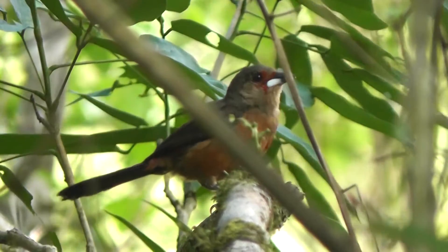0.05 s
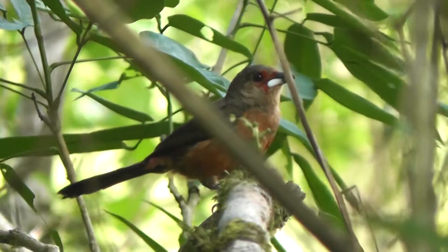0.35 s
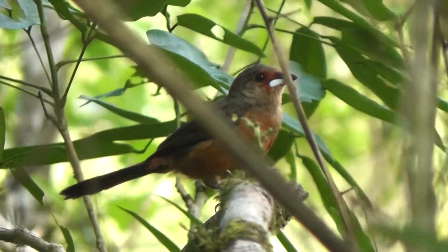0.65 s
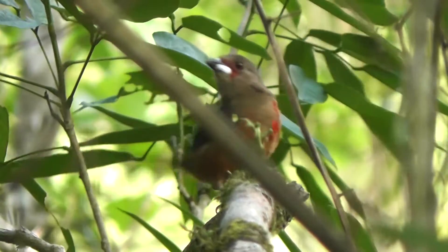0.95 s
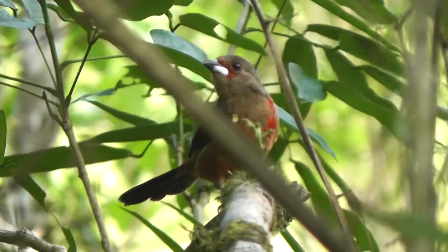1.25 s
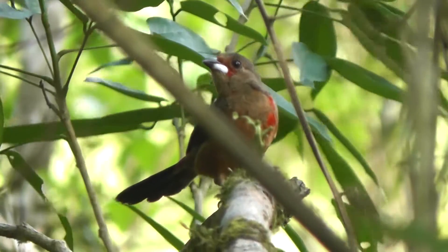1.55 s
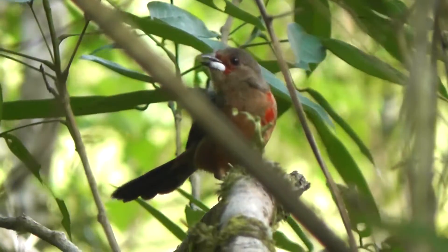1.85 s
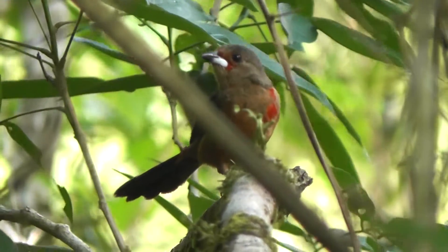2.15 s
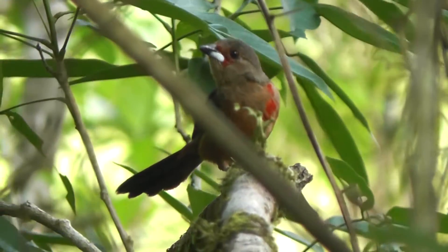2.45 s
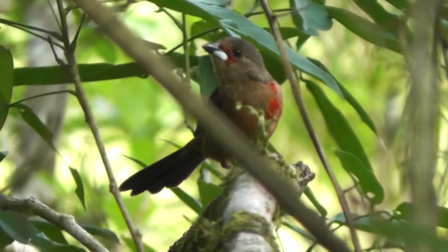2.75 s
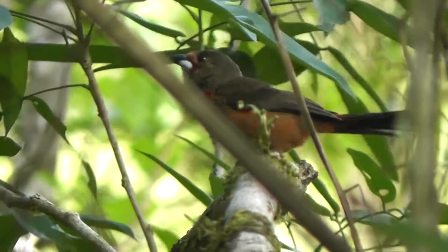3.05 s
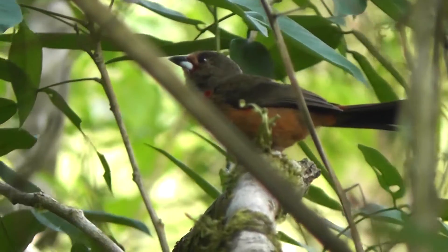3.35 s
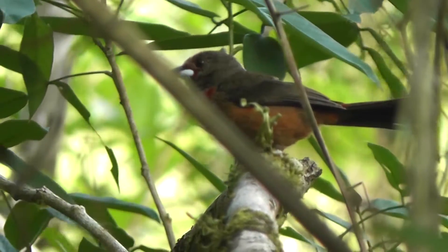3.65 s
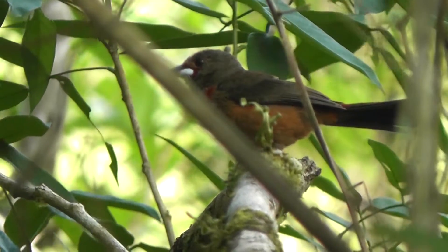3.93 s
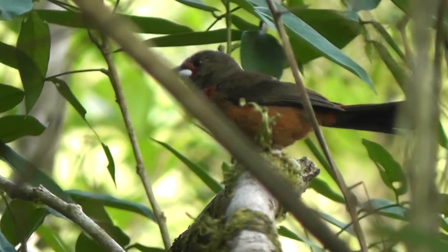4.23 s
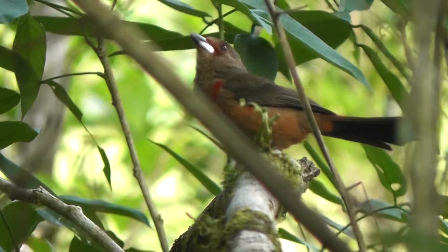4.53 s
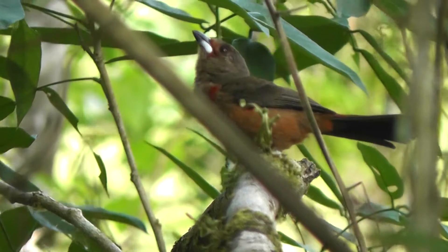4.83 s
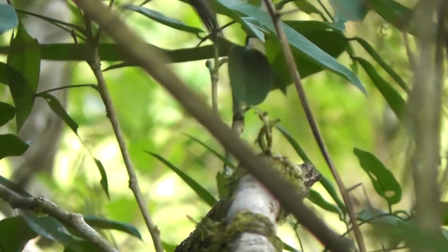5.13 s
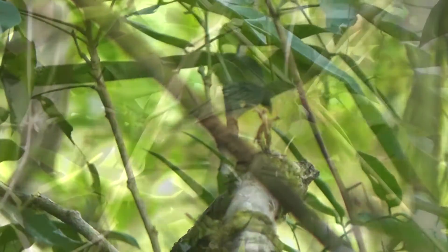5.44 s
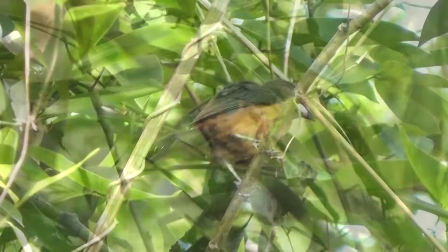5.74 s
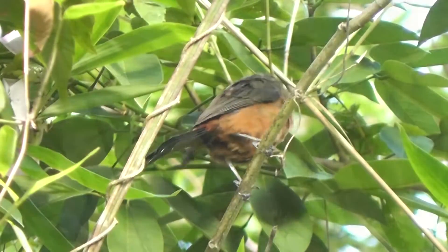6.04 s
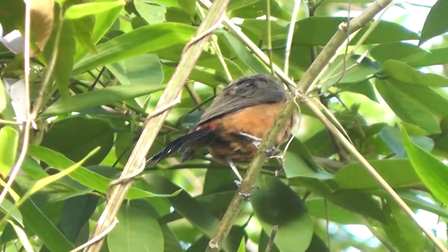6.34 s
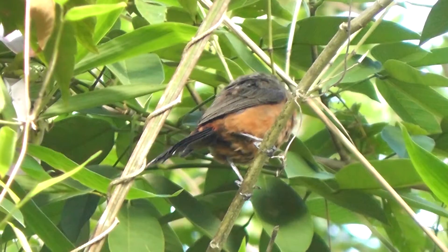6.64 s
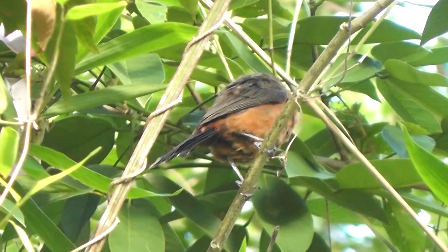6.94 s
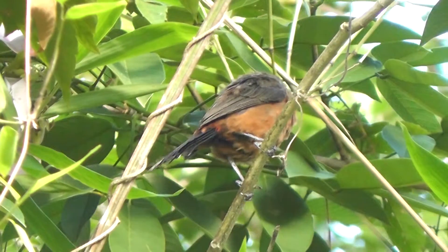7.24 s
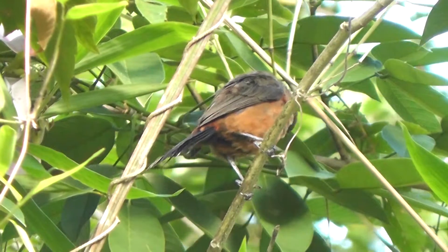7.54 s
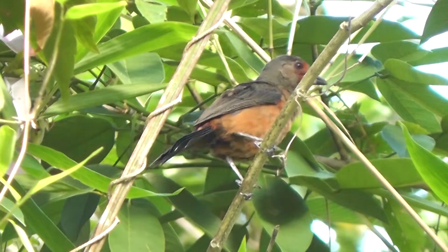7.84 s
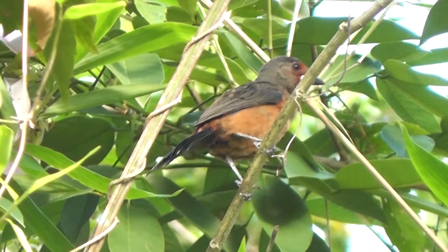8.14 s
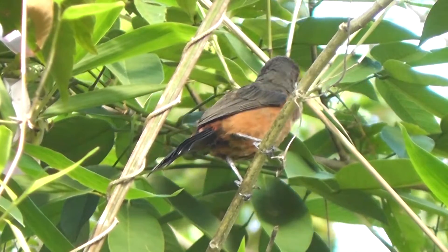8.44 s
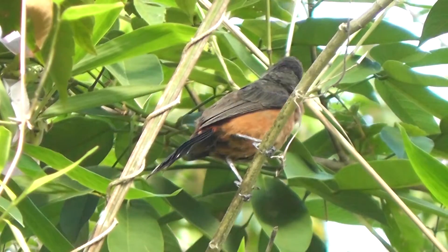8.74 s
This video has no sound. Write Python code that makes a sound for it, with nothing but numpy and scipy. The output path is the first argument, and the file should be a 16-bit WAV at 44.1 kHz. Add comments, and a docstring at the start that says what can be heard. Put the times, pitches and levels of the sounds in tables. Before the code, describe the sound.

Short, sharp downward bird calls cut through a high insect buzz, then the forest changes to a quieter spot with thin gliding calls.

```python
"""A sharp falling chip cuts through a high insect chorus: a tanager on a forest branch, who also
sings rising rasps. Thin slurs, lisps and whistles come from the foliage, far birds warble,
and two insects scrape their wings in pulse trains over a soft murmur and a swelling drone.
At 5.7 s the listening place changes abruptly to a quieter spot with a shrill buzz and a pipping insect."""
import sys
import numpy as np
from scipy import signal
from scipy.fft import rfft, irfft
from scipy.io import wavfile

SR = 44100
rng = np.random.default_rng(int(sys.argv[2]) if len(sys.argv) > 2 else 0)


def pcm_store(signal):
    """Save signal as 16-bit PCM."""
    levels = np.round(np.clip(np.atleast_2d(signal), -1, 1) * 32767)
    wavfile.write(sys.argv[1], SR, levels.astype(np.int16).T)


N = 396018
TIME = np.arange(N) / SR
MOVE_S = 5.701   # hard cut to the second spot

# Tanager chips, pitched by their 3rd harmonic: t/s, length/s, start f/Hz, held f/Hz, last fall/Hz,
# drop time/s, level/dB, crest/share of length, 4th/dB, 5th/dB, 6th/dB (harmonics against the 3rd)
CHIP_CALLS = [ (0.0848, 0.024, 9230, 3910, 50, 0.0067, -13.5, 0.22, 1, -24, -32),
              (1.005, 0.041, 5650, 3497, 1040, 0.0032, -16, 0.4, -1, -26, -21.5),
              (1.9823, 0.047, 5000, 3440, 1030, .0031, -23.5, 0.51, 1.5, -16, -34),
              (2.866, 0.039, 7700, 3934, 1170, 0.0077, -21.5, 0.48, -1.5, -2, -15),
              (3.1185, 0.046, 5030, 3486, 710, .0032, -22, 0.47, -3, -25, -20),
              (4.0574, 0.038, 7050, 3960, 1040, 0.009, -22, 0.53, -2, -2.5, -11),
              (4.4756, .042, 5130, 3460, 765, 0.00361, -22, 0.56, 2, -25, -16.5),
              (5.2155, 0.038, 7470, 3880, 1090, 0.0077, -21.5, 0.47, -1, -1.5, -8),
              (8.158, 0.052, 6350, 3780, 1115, 0.012, -29.5, 0.56, 4.5, -6.5, -8)]


def chips(jitter=0.015, sag_hz=260, beak_hz=8200, swell_db=8, decay_db=17.5, edge_s=0.0016):
    """The syrinx drops steeply, holds and sags; the throat passes only the 3rd harmonic and above."""
    out = np.zeros(N)
    for s, length, start_hz, held_hz, fall_hz, drop_s, db, crest, fourth, fifth, sixth in CHIP_CALLS:
        t = np.arange(int(length * SR)) / SR
        u = t / length
        drop = (start_hz - held_hz) * np.exp(-(t / drop_s) ** 1.3)
        hz = held_hz + drop - sag_hz * u - fall_hz * u ** 4
        off_crest = np.interp(u, [0, crest, 1], [1, 0, 1])
        envelope_db = -np.where(u < crest, swell_db, decay_db) * off_crest ** 1.35
        fundamental = hz / 3 * (1 + jitter * wobble(len(hz), 500))
        # the high, tense start is nearly pure; overtones fill in as the pitch settles
        fullness = np.minimum(1, 0.97 * held_hz / hz) ** 4.3
        voice = np.sin(turn(3 * fundamental))
        for k, partial_db in enumerate((fourth, fifth, sixth, sixth - 9), 4):
            partial = np.sin(k * turn(fundamental) + rng.uniform(0, 2 * np.pi))
            voice += fullness * from_db(partial_db) * partial / (1 + (k * fundamental / beak_hz) ** 18)
        add(out, s, from_db(db + envelope_db) * voice * fade(t, edge_s, edge_s))
    return out


# Resonance of the throat and open beak: f/Hz, level/dB
THROAT_EQ = [(2000, -18), (3000, -20), (3700, -10), (4700, -7), (5600, -7), (6400, -7.5), (7900, -30),
             (9000, -24), (10300, -45)]
# Tanager rasps: t/s, length/s, held f/Hz, time to top/s, surge time constant/s, level/dB,
# roughness/0-1, screech level/dB
RASP_CALLS = [(2.051, 0.16, 1302, .132, .026, -23.5, 0.42, -36),
              (3.309, 0.13, 1446, 0.12, 0.017, -29, 0.47, -33),
              (4.766, 0.16, 1410, .125, .016, -25, 0.37, -33)]


def rasps(creep_hz_per_s=3500, top_hz=2810, screech_hz=7620, flutter=0.85, swell_db=5):
    """A shaky rising harmonic stack with a rough, noisy screech in its upper range."""
    out = np.zeros(N)
    for s, length, held_hz, top_s, surge_s, db, rough, screech_db in RASP_CALLS:
        size = int(length * SR)
        t = np.arange(size) / SR
        # the pitch scoops up, creeps, then surges to the top
        scoop = 1 - 0.18 * np.exp(-t / 0.01234)
        creep = held_hz + creep_hz_per_s * t
        surge = np.exp(np.minimum(0, t - top_s) / surge_s)
        hz = scoop * (creep + (top_hz - creep) * surge)
        phase = turn(hz * (1 + 0.054 * rough * wobble(size, 500)))
        voice = np.zeros(size)
        for k in range(2, 8):
            partial = gain_at(THROAT_EQ, k * hz) * np.sin(k * phase + rng.uniform(0, 2 * np.pi))
            voice += partial * (1 + flutter * rough * wobble(size, 310))
        voice *= from_db(db + swell_db * t / length) * fade(t, 0.023, 0.02)
        screech = np.sin(turn(screech_hz * scoop * (1 + 0.061 * wobble(size, 664))))
        screech *= 1 + flutter * rough * wobble(size, 400)
        add(out, s, voice + from_db(screech_db) * screech * fade(t, 0.017, 0.048))
    return out


# Short harsh ticks and buzzes: t/s, length/s, centre f/Hz, width/Hz, level/dB
TICK_CALLS = [(1.843, 0.12, 5570, 650, -46.5), (5.058, 0.037, 7170, 1700, -36),
              (5.06, 0.031, 5110, 690, -37), (5.492, 0.023, 7050, 1090, -29),
              (5.506, 0.03, 6930, 1200, -31.5)]


def ticks():
    """Toneless bursts: a voice so irregular that only its resonance is left."""
    out = np.zeros(N)
    for s, length, hz, width_hz, db in TICK_CALLS:
        size = int(length * SR)
        burst = wobble(size, width_hz / 2) * np.sin(turn(np.full(size, hz))) * np.sqrt(2)
        add(out, s, from_db(db) * burst * signal.windows.tukey(size, 0.6))
    return out


def notes(table, shape, jitter, jitter_hz, crest, taper, haste=1, tremor_db=3):
    """Near-pure bird tones bending through `shape`, the pitch ratios at start, middle and end."""
    out = np.zeros(N)
    bend = np.polyfit([0, 0.5 ** haste, 1], np.log(shape), 2)
    for s, length, pitch, db in table:
        u = np.linspace(0, 1, int(length * SR))
        hz = pitch * np.exp(np.polyval(bend, u ** haste))   # haste < 1 speeds the start of the bend
        phase = turn(hz * (1 + jitter * wobble(len(u), jitter_hz)))
        swell = np.sin(np.interp(u, [0, crest, 1], [0, np.pi / 2, 0])) ** taper
        tremor = tremor_db * wobble(len(u), 60)
        add(out, s, from_db(db + tremor) * swell * np.sin(phase))
    return out


# Slurs that drop and level out, steep dives, slight arched peeps: t/s, length/s, f/Hz, level/dB
SLUR_NOTES = [ (5.758, 0.088, 6370, -40), (6.054, 0.056, 5330, -36.5), (6.132, 0.041, 3750, -44),
              (6.556, 0.084, 6440, -37), (7.152, 0.084, 4596, -35), (7.422, 0.079, 4780, -31.5),
              (7.420, 0.062, 6930, -48.5), (7.580, 0.1, 6480, -37.5), (8.926, 0.08, 6650, -38)]
DIVE_NOTES = [(6.448, 0.056, 4620, -36), (6.820, .06, 4800, -33), (7.966, 0.059, 4150, -36)]
PEEP_NOTES = [(6.785, 0.02, 6070, -45), (7.392, .024, 5650, -40), (7.824, 0.033, 7220, -36.5),
              (7.922, .029, 6550, -50)]


def slurs():
    """Thin gliding calls from the foliage, wet with echo."""
    kinds = (SLUR_NOTES, (1.654, 0.98, 0.9)), (DIVE_NOTES, (1.54, 1, 0.62)), (PEEP_NOTES, (0.86, 1, 0.83))
    calls = sum(notes(table, shape, jitter=0.014, jitter_hz=300, crest=0.33, taper=1.5, haste=0.8)
                for table, shape in kinds)
    return forest(calls, leaves_db=-4, leaves_t60=0.47, trunks_db=-3.5, trunks_t60=0.8, gap_s=0.011)


# High rising lisps: t/s, length/s, f/Hz, level/dB
LISP_NOTES = [ (0.074, 0.018, 8760, -37), (.628, 0.035, 8380, -30), (.758, 0.04, 8570, -32.5),
              (1.393, 0.037, 8670, -37.5), (1.935, .038, 8280, -29.5), (2.964, 0.05, 8680, -37),
              (6.239, 0.026, 8590, -36.5), (6.993, 0.032, 8780, -44.5), (7.749, 0.029, 8280, -36.5),
              (8.782, 0.032, 8520, -37)]


def lisps(shape=(0.98, 0.99, 1.04), flick_s=0.021, flick_rise=1.07, flick_db=-13):
    """Very high calls that lift slightly and end in a quick, faint upward flick."""
    calls = notes(LISP_NOTES, shape, jitter=0.024, jitter_hz=500, crest=0.74, taper=0.93)
    flicks = [(s + length - flick_s, flick_s, hz * shape[-1], db + flick_db)
              for s, length, hz, db in LISP_NOTES]
    flick_shape = (1, np.sqrt(flick_rise), flick_rise)
    calls += notes(flicks, flick_shape, jitter=0.05, jitter_hz=700, crest=0.26, taper=0.8)
    return forest(calls, leaves_db=-4.5, leaves_t60=0.25, trunks_db=-11.5, trunks_t60=0.76, gap_s=0.0086)


# Wavering whistles: t/s, length/s, f/Hz, level/dB
WHISTLE_NOTES = [ (.030, 0.063, 6200, -39), (.180, 0.21, 6070, -46.5), (5.378, 0.0635, 6150, -36.5),
                 (5.425, 0.046, 6360, -36), (5.487, 0.0495, 5790, -37.5), (5.565, 0.022, 5550, -35.5),
                 (5.655, 0.041, 5980, -34)]


def whistles():
    """Gently rising tones that arrive more as echo than as direct sound."""
    calls = notes(WHISTLE_NOTES, (0.94, 1, 1.1), jitter=0.02, jitter_hz=400, crest=0.58, taper=0.56)
    return forest(calls, leaves_db=-6.5, leaves_t60=0.23, trunks_db=3, trunks_t60=0.42, gap_s=0.0076)


# Far song in falls, rises, low arches and long sinking moans: t/s, length/s, f/Hz, level/dB
FALL_NOTES = [ (.125, .06, 3050, -48.5), (.226, .042, 3200, -40.5), (.232, .043, 4050, -42),
              (.272, 0.049, 2930, -49), (.775, .049, 3300, -50.5), (.862, .051, 2920, -50),
              (.952, .04, 3450, -41.5), (7.280, 0.035, 3700, -50.5)]
RISE_NOTES = [(.828, 0.044, 3330, -42.5), (2.818, 0.082, 3630, -46), (2.972, 0.049, 3330, -43),
              (3.498, .041, 2620, -51.5), (8.040, 0.041, 3500, -43.5)]
ARCH_NOTES = [ (1.250, 0.051, 2545, -50.5), (1.535, 0.065, 2550, -50), (3.505, .05, 3770, -44.5),
              (4.105, .047, 2690, -48), (4.605, 0.079, 2610, -47), (5.265, 0.0476, 2580, -50.5),
              (6.262, 0.074, 2640, -52), (7.165, 0.061, 2730, -53.5)]
MOAN_NOTES = [(7.720, .24, 1990, -67.5), (8.820, .16, 1990, -65.5)]


def far_warbles():
    """Faint, lower song; distance turns a large share of it into echo."""
    kinds = ((FALL_NOTES, (1.25, 0.99, 0.81)), (RISE_NOTES, (0.77, 1, 1.07)),
             (ARCH_NOTES, (0.99, 0.97, 0.82)), (MOAN_NOTES, (1.2, 1, 0.97)))
    calls = sum(notes(table, shape, jitter=0.024, jitter_hz=250, crest=0.46, taper=0.39)
                for table, shape in kinds)
    return forest(calls, leaves_db=-5.5, leaves_t60=0.21, trunks_db=-4, trunks_t60=0.83, gap_s=0.007)


# Chirping bouts of the near insect, the far one and the one that pips: from t/s, to t/s
NEAR_INSECT_BOUTS = [(0, .5), (.608, .7), (.835, 2.9), (3.016, 5.7)]
FAR_INSECT_BOUTS = [(.045, 3.1), (3.49, 5.7)]
PIPPING_BOUTS = [(8.146, 8.95)]


def insect(bouts, db, glide_hz, beat_s, chirp_every_s=0.1995, strokes=5, stroke_s=0.012):
    """Wings beat steadily and sound for a few strokes a chirp; each tone falls as the scraper slows."""
    out, size = np.zeros(N), int(stroke_s * SR)
    for s in np.concatenate([np.arange(start, end, chirp_every_s) for start, end in bouts]):
        for k in range(strokes):
            hz = np.linspace(*glide_hz, size) * (1 + rng.normal(0, 0.0074))
            stroke = from_db(db + rng.normal(0, 1.7)) * np.hanning(size) * np.sin(turn(hz))
            add(out, (round(s / beat_s) + k) * beat_s - stroke_s / 2, stroke)
    return out


# Colour of the shrill buzz: f/Hz, relative level/dB
SHRILL_EQ = [(1000, -70), (5800, -30), (6400, 3), (6900, -1), (7500, -3), (7850, -30), (10000, -67)]
# Its fader ride: t/s, level/dB
SHRILL_RIDE = [(5.7, -95), (6.1, -55.5), (6.9, -56), (7.6, -54.5), (8.05, -50), (8.25, -58), (8.98, -61)]


def shrill_buzz():
    """A narrow band of insect buzz that fades in at the second spot."""
    return from_db(np.interp(TIME, *np.transpose(SHRILL_RIDE))) * coloured(SHRILL_EQ)


# Colour of the far drone: f/Hz, relative level/dB
DRONE_EQ = [(200, -72), (800, -15), (1200, -6), (1600, -5.5), (1800, 1), (2100, 0.5), (2400, -13),
            (3000, -39), (6000, -73)]
# Its fader ride: t/s, level/dB
DRONE_RIDE = [(0, -92), (1.5, -67), (2.6, -70.5), (3.6, -65), (4.7, -60), (5.3, -60.5), (5.7, -65.5),
              (5.8, -78), (8.2, -78), (8.98, -71)]


def far_drone():
    """Faint midrange noise that swells and fades."""
    return from_db(np.interp(TIME, *np.transpose(DRONE_RIDE))) * coloured(DRONE_EQ)


# Colours of the forest murmur and insect chorus at each spot: f/Hz, relative level/dB
FIRST_MURMUR_EQ = [(18, -68), (30, -35), (80, -24.5), (190, -4.5), (301, -3), (509, 0.5), (696, -0.5),
                   (773, -4), (974, -9.5), (1230, -6), (1750, -10), (1990, -7.5), (2720, -11), (3730, -9),
                   (4500, -4.5), (5850, -34), (9900, -120)]
FIRST_CHORUS_EQ = [(300, -46), (3000, -34), (4500, -15), (5500, -5), (5850, 2.5), (6150, 7), (6600, 1),
                   (7300, -1), (7700, -9), (8300, -21.5), (9700, -25), (15500, -25.5)]
SECOND_MURMUR_EQ = [(18, -69), (30, -39), (75, -24), (167, -8), (224, -7), (307, -0.5), (448, 1), (696, -1),
                    (773, -3.5), (1510, -3), (1750, -7), (1910, -1), (2720, -8), (3500, -3.5), (4500, -5),
                    (5850, -57), (9900, -120)]
SECOND_CHORUS_EQ = [(300, -58), (3000, -19), (4500, -23), (5450, -5.5), (5850, 3), (6100, 7.5), (6600, -3),
                    (7300, -8.5), (7800, -22), (8300, -24.5), (9700, -27.5), (15500, -28)]


def forest_bed(murmur_eq, chorus_eq, murmur_db, chorus_db, flicker_db=2.5):
    """Low forest murmur under the blended, flickering buzz of many far insects."""
    chorus = from_db(chorus_db + flicker_db * wobble(N, 30)) * coloured(chorus_eq)
    return from_db(murmur_db) * coloured(murmur_eq) + chorus


def forest(x, leaves_db, leaves_t60, trunks_db, trunks_t60, gap_s, dull_hz=15000):
    """Direct sound, a quick spray of echoes off near branches and a longer, duller tail off far trunks."""
    t = np.arange(SR) / SR

    def echoes(db, t60, density):
        spray = rng.standard_normal(SR) * (rng.random(SR) < density)
        spray *= from_db(-60 * t / t60) * (1 - np.exp(-(t / gap_s) ** 2))
        return from_db(db) * spray / np.sqrt(np.sum(spray ** 2))

    leaves = echoes(leaves_db, leaves_t60, density=0.03)
    trunks = cut(echoes(trunks_db, trunks_t60, density=0.2), "low", dull_hz, order=1)
    return x + signal.fftconvolve(x, leaves + trunks)[:N]


def from_db(db):
    """Decibels to gain."""
    return 10 ** (np.asarray(db) / 20)


def gain_at(eq, hz):
    """Gain of an EQ curve, joined on a log-frequency axis."""
    points, db = np.transpose(eq)
    return from_db(np.interp(np.log(hz + 1), np.log(points), db))


def coloured(eq):
    """Steady noise through an EQ curve; rms 1."""
    hz = np.arange(N // 2 + 1) * SR / N
    noise = irfft(rfft(rng.standard_normal(N)) * gain_at(eq, hz), N)
    return noise / np.std(noise)


def wobble(size, hz):
    """Random motion up to about hz; spread near 1."""
    slow = cut(rng.standard_normal(size + 4000), "low", hz, order=2)[4000:]
    return slow / np.sqrt(2.8 * hz / SR)


def turn(hz):
    """Running phase of a pitch track."""
    return 2 * np.pi * np.cumsum(hz) / SR


def cut(x, kind, hz, order):
    """Butterworth high- or low-pass."""
    return signal.sosfilt(signal.butter(order, hz, kind, fs=SR, output="sos"), x)


def fade(t, attack_s, release_s):
    """Straight attack, hold and straight release."""
    return np.minimum(1, t / attack_s) * np.minimum(1, (t[-1] - t) / release_s)


def add(out, s, sound):
    """Mix a sound in from time s."""
    at = round(s * SR) + np.arange(len(sound))
    inside = (at >= 0) & (at < N)
    out[at[inside]] += sound[inside]


def scene():
    """Birds and drone run through; the whistles, insects and bed of the first spot stop at the move."""
    birds = forest(chips(), leaves_db=-5, leaves_t60=0.16, trunks_db=-7.5, trunks_t60=0.49,
                   gap_s=0.0057, dull_hz=4160)
    harsh = cut(rasps() + ticks(), "low", 9600, order=10)
    birds += forest(harsh, leaves_db=-2.5, leaves_t60=0.26, trunks_db=-11, trunks_t60=0.55, gap_s=0.0031)
    birds += slurs() + lisps() + far_warbles()

    first = whistles()
    chirps = insect(NEAR_INSECT_BOUTS, db=-38, glide_hz=(7380, 6444), beat_s=0.01901)
    chirps += insect(FAR_INSECT_BOUTS, db=-43, glide_hz=(6273, 5700), beat_s=0.0197)
    first += forest(chirps, leaves_db=-5.5, leaves_t60=0.12, trunks_db=-25.5, trunks_t60=0.45, gap_s=0.023)
    first += forest_bed(FIRST_MURMUR_EQ, FIRST_CHORUS_EQ, murmur_db=-58.5, chorus_db=-50)

    second = forest_bed(SECOND_MURMUR_EQ, SECOND_CHORUS_EQ, murmur_db=-62.5, chorus_db=-52)
    second += shrill_buzz()
    second += insect(PIPPING_BOUTS, db=-51, glide_hz=(7300, 7230), beat_s=0.023678,
                     chirp_every_s=0.0947, strokes=2, stroke_s=0.02)
    return (birds + far_drone() + np.where(TIME < MOVE_S, first, second))[None]


def record(dry, top_hz=15750):
    """The small microphone sheds the deep bass; the top is cut steeply."""
    thin = cut(dry, "high", 67, order=1)
    return signal.sosfilt(signal.ellip(10, 0.1, 70, top_hz, fs=SR, output="sos"), thin)


dry = scene()
out = record(dry)
pcm_store(out)
```